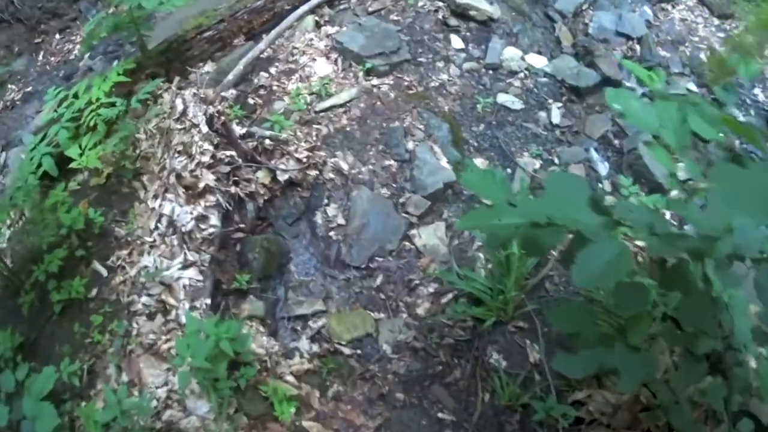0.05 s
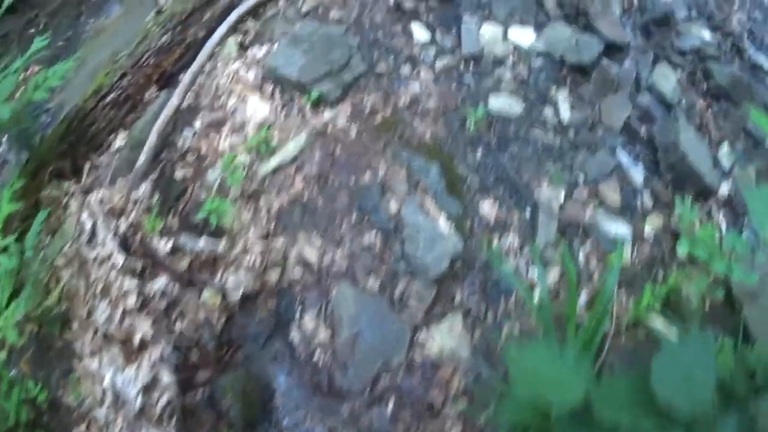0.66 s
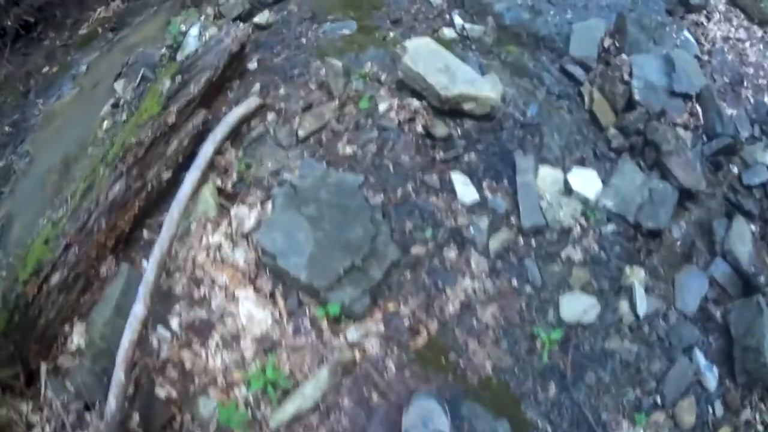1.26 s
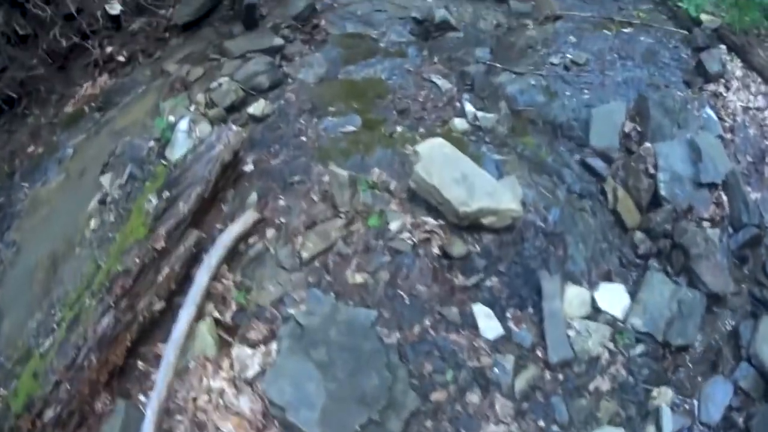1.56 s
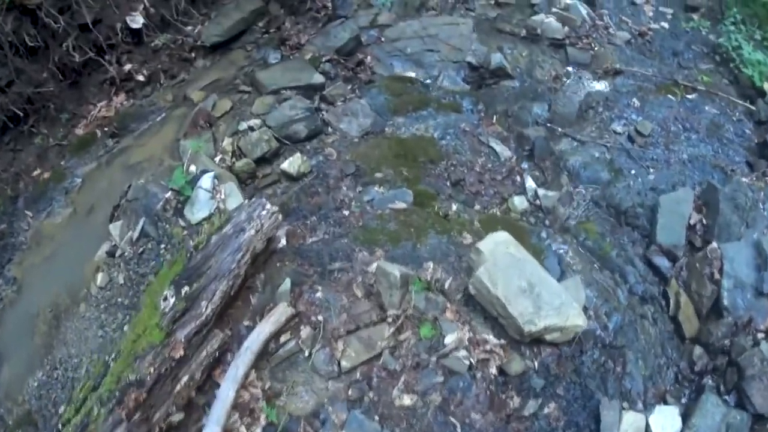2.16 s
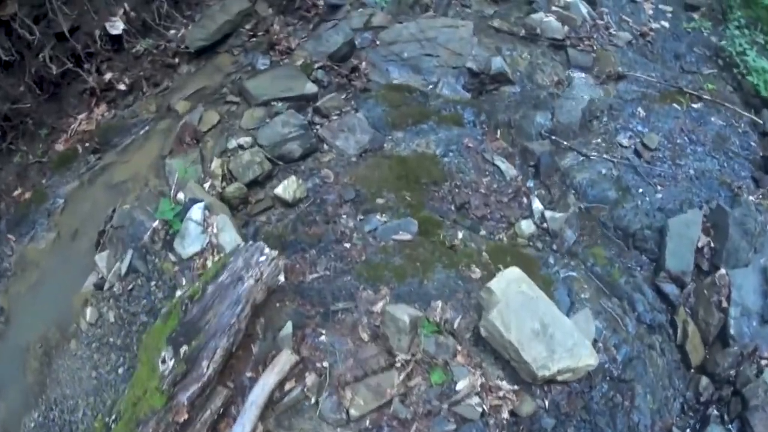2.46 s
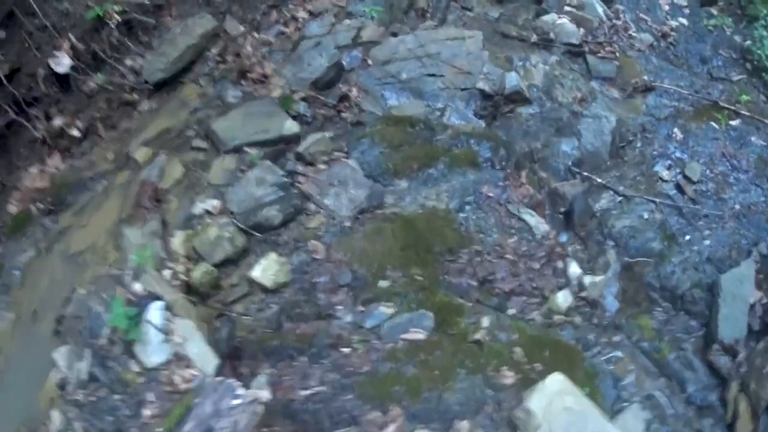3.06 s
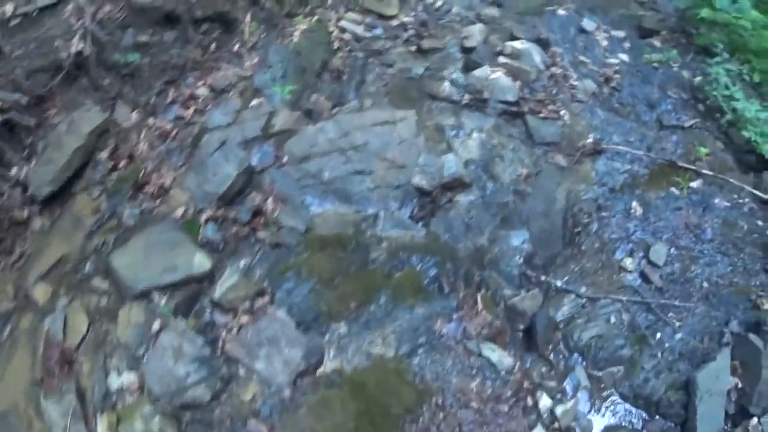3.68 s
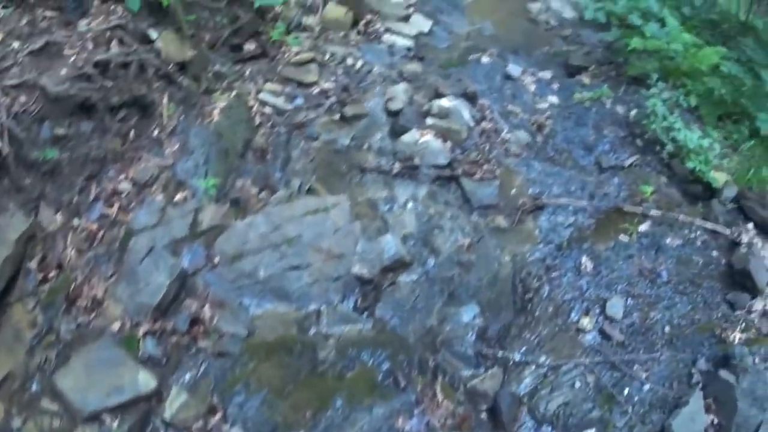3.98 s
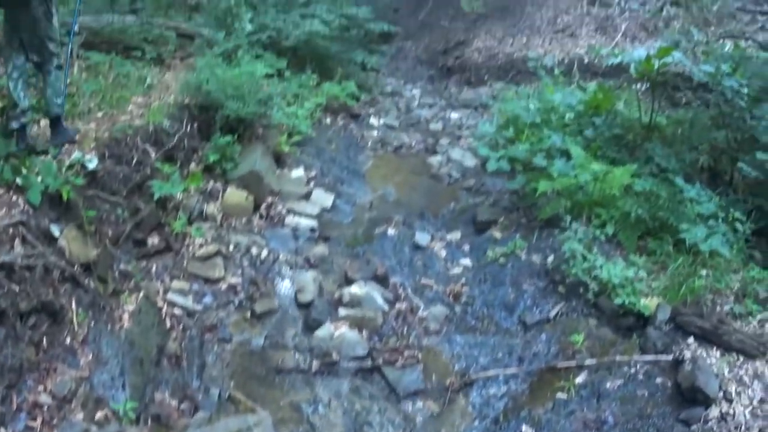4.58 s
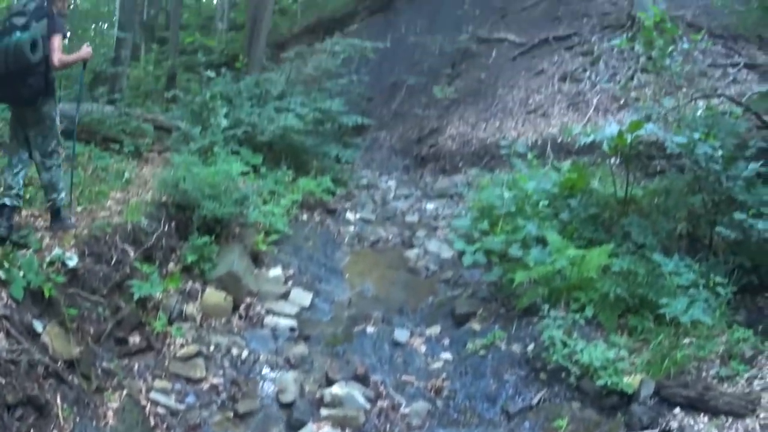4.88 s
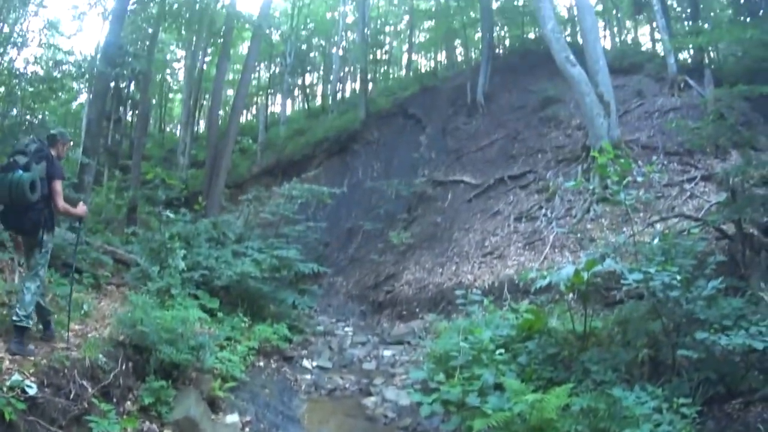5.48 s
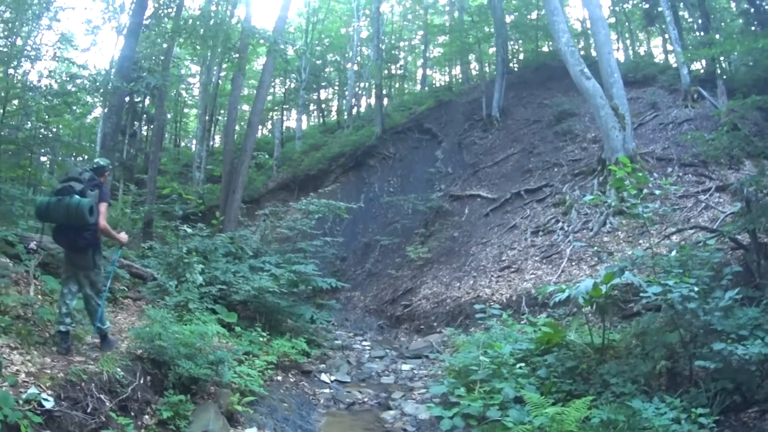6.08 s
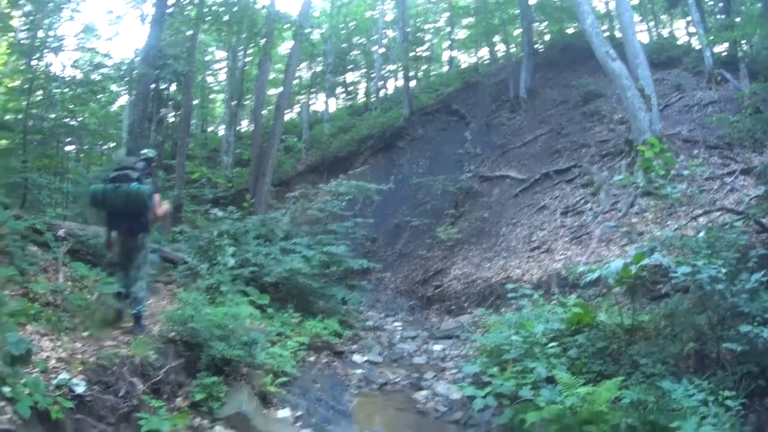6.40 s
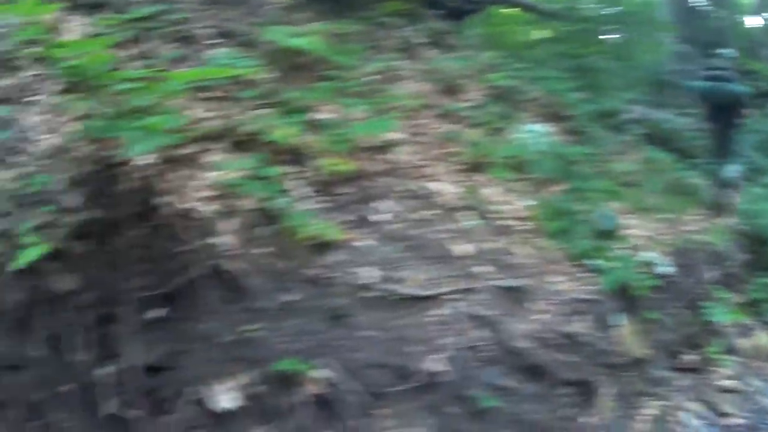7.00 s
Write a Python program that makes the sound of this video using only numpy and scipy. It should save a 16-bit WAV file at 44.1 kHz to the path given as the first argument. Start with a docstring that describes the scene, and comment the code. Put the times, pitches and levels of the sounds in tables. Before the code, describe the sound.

Footsteps on a stony stream bed clack and crunch, then ease off, leaving quiet water, drips and rustling cloth.

```python
"""Hiker on loose slate in a forest stream bed.

Boots thud on soil and grind on grit; tipped slabs knock and ring, thin flakes skid and scrape.
Clothes and leaves rustle as dense runs of tiny contacts, the leaves near the end.
A thin stream murmurs and drips throughout; banks and trees return a faint echo."""
import sys
import numpy as np
from scipy import signal
from scipy.fft import rfft, irfft
from scipy.io import wavfile

SR = 44100
rng = np.random.default_rng(int(sys.argv[2]) if len(sys.argv) > 2 else 0)


def transcribe(u):
    """Save the signal u as a 16-bit wav file named by the first command-line argument.

    u: samples, shape (n,) or (channels, n), limited to [-1, 1]; the rate is SR.
    q: integer samples, one column per channel.
    """
    v = np.clip(np.atleast_2d(u).T, -1, 1)
    q = np.round(v * 32767).astype(np.int16)
    wavfile.write(sys.argv[1], SR, q)


N = 319725
TIME = np.arange(N) / SR
HIT_N = SR // 6  # samples per short event
HIT_TIME = TIME[:HIT_N]


def undb(db):
    """Decibels to gain."""
    return 10 ** (np.asarray(db) / 20)


def unit_rms(x):
    """Scale to rms 1."""
    return x / np.sqrt(np.mean(x ** 2) + 1e-20)


def peak(x, db):
    """Scale to a peak level."""
    return x * undb(db) / np.abs(x).max()


def add(track, time_s, x):
    """Mix a sound into a stereo track."""
    start = max(int(time_s * SR), 0)
    track[:, start:start + x.shape[-1]] += x[..., :N - start]


def pan(x, pan_db):
    """Place left (+) or right (-)."""
    return x * undb(np.array([[pan_db], [-pan_db]]) / 2)


def widen(make, side_db, pan_db):
    """Two draws of a source: one panned, one in antiphase."""
    return pan(make(), pan_db) + undb(side_db) * make() * np.array([[1], [-1]])


def cut(x, hz, kind, order=2):
    """Butterworth low-pass or high-pass."""
    return signal.sosfilt(signal.butter(order, min(hz, SR / 2 - 1), kind, fs=SR, output="sos"), x)


def band(x, hz, width_hz):
    """One resonance, gain 1 at its centre."""
    hz = min(hz, SR * .4)
    return signal.lfilter(*signal.iirpeak(hz, hz / min(width_hz, SR / 4), SR), x)


def colour(x, spectrum):
    """Minimum-phase filter through (frequency [Hz], level [dB]) points; output rms 1."""
    hz, db = np.transpose(spectrum)
    grid_hz = np.linspace(1, SR / 2, 1025)
    gain = undb(np.interp(np.log(grid_hz), np.log(hz), db))
    cepstrum = irfft(np.log(gain))
    causal_fold = 1 + np.sign(np.fft.fftfreq(len(cepstrum)))
    response = irfft(np.exp(rfft(cepstrum * causal_fold)))
    return unit_rms(signal.fftconvolve(x, response)[:len(x)])


def blow(t60_s, rise_s):
    """Impact envelope: contact builds, ring dies."""
    return (1 - np.exp(-(HIT_TIME / rise_s) ** 2)) * np.exp(-np.log(1000) * HIT_TIME / t60_s)


def press(time_s, hold_s, attack_s, release_s):
    """Slow contact envelope: build, hold, release."""
    age_s = TIME - time_s
    return np.clip(age_s / attack_s, 0, 1) * np.exp(-np.maximum(age_s - hold_s, 0) / release_s)


def ring(hz, t60_s, rise_s):
    """One damped mode."""
    return np.sin(2 * np.pi * hz * HIT_TIME) * blow(t60_s, rise_s)


def drift(rate_hz):
    """Smooth random drift, rms 1."""
    knots = rng.standard_normal(N // 100)
    return unit_rms(np.interp(TIME * rate_hz, np.arange(len(knots)), knots))


def grains(n, per_s, spread_db):
    """Tiny contacts at random times, most weak, a few strong."""
    when, strength, sign = rng.random((int(n * per_s / SR) + 1, 3)).T
    gain = undb(-spread_db * np.log(strength + .02)) * np.sign(sign - .5)
    return np.bincount((when * n).astype(int), gain, n)


def grit(n, per_s, spread_db, top_hz, t60_s, ring_n=256):
    """Tiny contacts, each ringing briefly at its own pitch."""
    t = TIME[:ring_n]
    hz = np.linspace(0, top_hz, ring_n)[:, None]
    rings = np.sin(2 * np.pi * hz * t) * np.exp(-np.log(1000) * t / t60_s)
    when, strength, pitch, sign = rng.random((int(n * per_s / SR) + 1, 4)).T
    gain = undb(-spread_db * np.log(strength + .02)) * np.sign(sign - .5)
    particles = gain[:, None] * rings[(pitch * ring_n).astype(int)]
    samples = (when * n).astype(int)[:, None] + np.arange(ring_n)
    return np.bincount(samples.ravel(), particles.ravel(), n)[:n]


# Running water (frequency [Hz], level [dB])
STREAM_SPECTRUM = [(25, -10), (60, -4), (130, 0), (380, 0), (600, -3), (1100, -4), (2000, -8), (4500, -13),
                   (7000, -14), (11000, -18)]

def stream():
    """Shallow water: murmur from all around, fine hiss from ahead."""
    ahead, around = (colour(rng.standard_normal(N), STREAM_SPECTRUM) * undb(.8 * drift(21))
                     for _ in range(2))
    side = undb(-6.5) * around + undb(4.0) * band(around, 550, width_hz=1000)
    return undb(-63) * (ahead + side * np.array([[1], [-1]]))


def forest_echo(near, t60_s, echo_db):
    """Banks and trunks scatter a thin tail, independent left and right."""
    t = TIME[:SR]
    decay = np.exp(-np.log(1000) * t / t60_s) * (1 - np.exp(-t / 0.0116))
    spectrum = [(100, -4.5), (1200, -11), (4000, -0.5), (11000, -11.5)]
    echoes = []
    for channel in near:
        tail = colour(grains(SR, per_s=3600, spread_db=3.8), spectrum) * decay
        echoes.append(signal.fftconvolve(channel, tail / np.linalg.norm(tail))[:N])
    return undb(echo_db) * np.array(echoes)


def bubble(hz, cycles, glide):
    """A trapped bubble rings, rising in pitch as it nears the surface."""
    t60_s = cycles / hz
    stretch = 1 + glide * np.minimum(HIT_TIME / t60_s, 1)
    return np.sin(2 * np.pi * hz * HIT_TIME * stretch) * blow(t60_s, rise_s=0.00037)


def snap(hz, db):
    """One tiny contact with a very short ring."""
    burst = rng.standard_normal(HIT_N) * blow(t60_s=0.0091, rise_s=0.00021)
    return peak(band(burst, hz, width_hz=0.19 * hz), db)


# Drops and pebbles in puddles (time [s], level [dB], bubble pitch [Hz], t60 [cycles])
PUDDLE_DROPS = [(.1742, -41.5, 1530, 16), (2.7833, -47, 1510, 52), (3.61, -23, 1390, 18),
                (3.62, -33, 1390, 19), (4.449, -50, 3300, 56), (4.8156, -44.5, 1120, 30),
                (5.171, -41.5, 2800, 87), (5.329, -51.5, 1930, 33), (5.36, -50, 1350, 37),
                (5.608, -51, 1440, 66), (5.6953, -41, 1370, 33), (5.828, -49, 1720, 32),
                (5.9244, -39.5, 1970, 44), (5.9522, -48.5, 1340, 30), (6.279, -54, 1360, 37)]

def drips(count=280):
    """A few clear drops among small bubbles and splashes that grow as the pools come near."""
    out = np.zeros((2, N))
    for time_s, db, hz, cycles in PUDDLE_DROPS:
        add(out, time_s, pan(peak(bubble(hz, cycles, glide=0.037), db), -3.0))
    for when, pitch, strength, side in rng.random((count, 4)):
        db = -64 + 10 * strength ** 2 + 4 * when
        plink = peak(bubble(1100 * 6 ** pitch, cycles=40, glide=0.09), db)
        add(out, when * N / SR, pan(plink, 8 * (side - .5)))
    for when, pitch, strength, side in rng.random((count, 4)):
        db = -61 + 10 * strength ** 3 + 3 * when
        splash = snap(3000 * 2.7 ** pitch, db)
        add(out, when * N / SR, pan(splash, 8 * (side - .5)))
    return out


# Cloth and foliage (frequency [Hz], level [dB])
RUSTLE_SPECTRUM = [(60, -12.5), (160, -1), (380, -4), (560, -4.5), (1000, -0.5), (1800, -1.5), (3000, -1),
                   (6500, -3), (11000, -7)]
# Sleeve and trouser strokes (time [s], length [s], level [dB], low-pass [Hz])
CLOTH_STROKES = [(.01, 0.16, -65, 3970), (0.425, 0.33, -66.5, 3460), (1.559, 0.23, -57, 9100),
                 (3.066, 0.11, -63, 10000), (3.482, 0.13, -67, 9000), (3.699, 0.52, -57.5, 9100),
                 (3.8, 0.04, -50.5, 9050), (3.863, 0.082, -52.5, 10000), (4.184, .12, -63.5, 8000),
                 (4.306, 0.12, -59.5, 7040), (4.491, 0.165, -53, 10600), (4.642, 0.068, -57.5, 4970),
                 (4.829, 0.45, -61, 4960), (5.387, 0.048, -60.5, 5000), (6.025, 0.1, -60, 3480),
                 (6.353, 0.045, -65.5, 9100), (6.684, 0.082, -59, 5030), (6.831, 0.039, -65, 6100)]

def clothes():
    """Fibres catch and slip in quick, uneven swells."""
    out = np.zeros((2, N))
    catch = undb(2.66 * drift(110))
    for time_s, length_s, db, lowpass_hz in CLOTH_STROKES:
        n = int(length_s * SR)
        swell = np.sin(np.pi * (np.arange(n) / n) ** 0.46) ** 0.58
        speed = swell * catch[int(time_s * SR):][:n]

        def stroke():
            fibres = grit(n, per_s=6000, spread_db=1.2, top_hz=11240, t60_s=0.0046)
            return unit_rms(cut(colour(fibres, RUSTLE_SPECTRUM), lowpass_hz, "low", order=1))

        add(out, time_s, undb(db) * speed * widen(stroke, side_db=-10.5, pan_db=1.0))
    return out


# Passing fronds (time [s], hold [s], level [dB])
FROND_SWEEPS = [(6.994, 0.21, -51), (7.145, 0.089, -44)]

def leaves():
    """Foliage drags past on the right in dense, uneven crackles."""
    drag = sum(undb(db) * press(time_s, hold_s, attack_s=.075, release_s=.035)
               for time_s, hold_s, db in FROND_SWEEPS)
    crackle = widen(lambda: colour(grains(N, per_s=7000, spread_db=2.7), RUSTLE_SPECTRUM),
                    side_db=-10, pan_db=-5.5)
    return crackle * drag * undb(0.95 * drift(90))


# Soil creak, gravel grind, grit hiss (frequency [Hz], level [dB])
SOIL_SPECTRUM = [(24, -43), (40, -23.5), (155, -1.5), (214, -2), (265, -0.5), (413, 3), (525, -7.5),
                 (700, -6), (910, -57), (1540, -120)]
GRIND_SPECTRUM = [(200, -11.5), (450, -5), (750, -1.5), (1150, -3.5), (1600, -6.5), (2100, -17),
                  (3500, -24.5), (8000, -35.5)]
HISS_SPECTRUM = [(700, -16.5), (1500, 1.5), (3200, -3), (4800, -2.5), (7200, -5), (9000, -12),
                 (11500, -17.5)]
# Boot taking weight or pivoting (time [s], hold [s], soil level [dB], grind level [dB])
WEIGHT_SHIFTS = [(0.0, 0.045, -60.5, -60), (.29, 0.042, -67, -59), (.41, 0.17, -61, -59),
                 (.63, 0.089, -69, -57.5), (.83, .09, -59, -54.5), (.96, .14, -55, -60.5),
                 (1.2, 0.17, -65, -62.5), (1.36, 0.21, -59, -58.5), (1.759, 0.26, -63.5, -61),
                 (2.08, 0.22, -66, -64.5), (2.35, 0.23, -59.5, -62), (2.68, .08, -65.5, -65),
                 (3.04, 0.28, -63, -60), (3.43, 0.13, -60.5, -54), (3.69, .27, -66, -60),
                 (4.02, 0.14, -68.5, -65), (4.29, 0.075, -74, -64), (4.5, 0.22, -79, -70),
                 (4.87, 0.19, -67, -68), (5.78, .42, -70, -79.5), (6.63, 0.065, -68, -69),
                 (7.0, .25, -75, -61)]

def tread():
    """Shifting weight makes soil creak low and gravel grind, with a little hiss."""
    soil_gain, grind_gain = undb(-77.5), undb(-74)  # the standing foot never fully rests
    for time_s, hold_s, soil_db, grind_db in WEIGHT_SHIFTS:
        load = press(time_s, hold_s, attack_s=0.026, release_s=0.13)  # sole rolls on, ground settles
        soil_gain = np.hypot(soil_gain, undb(soil_db) * load)
        grind_gain = np.hypot(grind_gain, undb(grind_db) * load)
    soil = widen(lambda: colour(grains(N, per_s=900, spread_db=2.76), SOIL_SPECTRUM),
                 side_db=-14.0, pan_db=-6.0)
    gravel = widen(lambda: colour(grit(N, 900, 3.1, top_hz=2660, t60_s=0.0098), GRIND_SPECTRUM),
                   side_db=-9.5, pan_db=-2.5)
    hiss = widen(lambda: colour(grit(N, 2200, 1.7, top_hz=10980, t60_s=0.0097), HISS_SPECTRUM),
                 side_db=-9.0, pan_db=-0.3)
    creak = soil * soil_gain * undb(1.9 * drift(35))
    grind = (gravel + undb(-5.5) * hiss) * grind_gain * undb(1.5 * drift(50))
    return creak + grind


# Grit and twig snaps (time [s], level [dB], ring [Hz])
GRIT_SNAPS = [(.05, -41, 1800), (0.0886, -43.5, 2560), (0.554, -44, 1290), (.859, -41, 1190),
              (.8955, -38.5, 1650), (1.051, -43, 1400), (2.488, -43, 4600), (2.729, -43, 7700),
              (2.9047, -35.5, 4800), (3.086, -45, 6750), (3.114, -43, 6160), (3.1723, -40, 6500),
              (3.2628, -37, 7650), (3.3552, -43.5, 3200), (3.3546, -44, 5640), (3.433, -46, 6100),
              (3.461, -44, 5400), (3.7066, -43, 5650), (4.0125, -43, 4970), (4.402, -45, 4120),
              (4.427, -41.5, 5840), (5.2677, -44, 5860), (5.71, -43.5, 3620), (5.9739, -42.5, 3180),
              (6.473, -49.5, 6870), (6.53, -46.5, 6120), (6.571, -49, 7500), (6.5975, -47.5, 4830),
              (6.92, -48.5, 4180), (7.1844, -30, 2620), (7.1856, -29, 5660)]

def grit_ticks():
    """Single grains and twig tips snap."""
    out = np.zeros((2, N))
    for time_s, db, hz in GRIT_SNAPS:
        add(out, time_s, snap(hz, db))
    return pan(out, -.5)


# Sole on wet grit (time [s], length [s], level [dB], relative hiss [dB])
SOLE_SCUFFS = [(0.02, 0.1, -56, -26), (0.723, 0.033, -52, -1.5), (0.913, 0.08, -46.5, -24),
               (0.955, 0.069, -46, -26), (1.087, 0.12, -56, -31), (1.412, 0.056, -48.5, -7),
               (1.518, 0.044, -48, 5), (1.627, 0.047, -62.5, 11), (1.94, 0.053, -43.5, -9),
               (2.905, 0.095, -43, -10), (2.944, 0.025, -40, -5), (2.964, 0.062, -42.5, -7.5),
               (2.983, 0.024, -42.5, -1.5), (3.008, .11, -50, -9.5), (3.23, 0.034, -46, 1),
               (3.89, 0.025, -53, -5)]

def boot_scuffs():
    """Grit crushed under the sole sounds dull; grit at its edge hisses."""
    out = np.zeros((2, N))
    for time_s, length_s, db, hiss_db in SOLE_SCUFFS:
        pressure = np.sin(np.pi * np.minimum(HIT_TIME / length_s, 1) ** 0.3)
        crush = colour(grains(HIT_N, per_s=1800, spread_db=5.1), GRIND_SPECTRUM)
        hiss = colour(grains(HIT_N, per_s=4000, spread_db=2.4), HISS_SPECTRUM)
        add(out, time_s, undb(db) * pressure * (pan(crush, -4.5) + undb(hiss_db) * pan(hiss, -1)))
    return out


# Heel and sole landings (time [s], level [dB], pitch [Hz], t60 [s])
FOOTFALLS = [(0.402, -46, 686, 0.018), (.419, -39, 550, 0.0094), (0.457, -43, 230, 0.015),
             (.511, -41, 282, 0.03), (0.5227, -41.5, 197, 0.016), (.908, -31.5, 310, 0.034),
             (0.9413, -35.5, 100, .04), (1.118, -41.5, 115, .045), (1.314, -38.5, 330, 0.021),
             (1.377, -46, 400, 0.029), (1.525, -37.5, 228, 0.059), (1.954, -40.5, 220, 0.05),
             (2.067, -37, 328, 0.031), (2.1338, -42.5, 169, 0.034), (2.2234, -42.5, 320, 0.022),
             (2.4457, -45.5, 206, 0.0082), (2.6987, -46, 327, 0.039), (2.895, -36, 223, 0.017),
             (2.9648, -28.5, 224, 0.0085), (3.143, -45.5, 135, 0.035), (3.235, -34, 306, 0.017),
             (3.452, -42, 250, 0.02), (3.4616, -29.5, 190, 0.033), (3.898, -54, 126, 0.072),
             (4.801, -57, 138, 0.045), (5.259, -51, 136, 0.042), (5.486, -50.5, 193, 0.044),
             (6.1811, -45, 290, 0.0063), (6.72, -54, 147.4, 0.032)]

def boot_thuds():
    """Rubber on packed soil: a few low cycles and a muffled crush."""
    out = np.zeros((2, N))
    for time_s, db, hz, t60_s in FOOTFALLS:
        modes = ring(hz, t60_s, rise_s=0.0008) + 0.3 * ring(2.1 * hz, 0.98 * t60_s, rise_s=0.0021)
        soil = cut(modes, 80, "high")
        crush = colour(rng.standard_normal(HIT_N), GRIND_SPECTRUM) * blow(t60_s=0.0061, rise_s=0.00017)
        add(out, time_s, peak(soil, db) + peak(crush, db - 4))
    return pan(out, -5.5)


# Modes of a thin flake (frequency [Hz], width [Hz], level [dB])
FLAKE_RESONANCES = [(1220, 90, 10), (2298, 87, 2), (2983, 360, -1), (3415, 200, -4), (4340, 130, 0),
                    (5000, 260, -5), (7450, 210, -1.5), (8400, 870, -9)]
# Flake skidding on flake (time [s], level [dB], favoured ring [Hz], t60 [s])
FLAKE_SKIDS = [(.3492, -27, 3340, 0.067), (1.5135, -26, 3430, 0.033), (1.517, -21.5, 3300, 0.011),
               (1.5238, -19, 3160, 0.036), (1.5245, -25.5, 1230, 0.06), (1.5792, -26.5, 4600, 0.029),
               (1.5845, -23, 2310, .018), (1.5908, -25, 3400, .026), (1.653, -37.5, 2310, 0.072),
               (3.2318, -34.5, 1240, 0.21), (3.2325, -30, 7300, 0.038)]

def flake_scrapes():
    """A contact and a dying run of slips ring a flake; the contact point decides which mode leads."""
    out = np.zeros((2, N))
    for time_s, db, favoured_hz, t60_s in FLAKE_SKIDS:
        slips = grains(HIT_N, per_s=9800, spread_db=3.5) * blow(t60_s, rise_s=0.0011)
        force = signal.unit_impulse(HIT_N) + undb(-3.5) * slips / np.linalg.norm(slips)
        flake = np.zeros(HIT_N)
        for hz, width_hz, mode_db in FLAKE_RESONANCES:
            octaves_off = abs(np.log2(hz / favoured_hz))
            flake += undb(mode_db - 22 * octaves_off ** .5) * band(force, hz, width_hz)
        add(out, time_s, peak(flake, db))
    return pan(out, -1.8)


# Modes of a slab (frequency [ratio], level [dB], t60 [ratio])
SLAB_RESONANCES = [(.7, -10.5, 0.55), (.9, 5.5, 1.2), (1.11, 11, 0.84), (1.32, 5.5, 0.84),
                   (1.48, -5.5, 0.68), (1.67, -13.5, 0.92), (2.85, -13, 0.59)]
# Contact crack (frequency [Hz], level [dB])
CRACK_SPECTRUM = [(120, -30), (500, 1), (1500, -4.5), (2100, -9), (3000, 3), (4500, -11.5), (6000, -13.5),
                  (7400, -10.5), (9000, -21.5), (11500, -27)]
# Stone on stone (time [s], level [dB], ring [Hz], t60 [s], relative thud [dB], relative crack [dB])
SLAB_HITS = [(0.0237, -41.5, 1630, 0.022, -4, -20), (0.301, -35.5, 1080, 0.0073, -18, -18),
             (0.3481, -28, 1053, 0.015, -24, 1.5), (0.4274, -46, 910, 0.0099, 0, -20),
             (0.819, -41, 1080, 0.025, -3, -6), (0.9406, -6, 1064, 0.014, -9, -10.5),
             (0.9434, -16.5, 1536, 0.0088, -12, -10), (0.9536, -10.5, 1110, 0.0084, -24, -15),
             (1.0902, -36, 610, 0.064, 2.5, -20), (1.117, -32.5, 785, 0.014, -0.5, -22),
             (1.2476, -44, 1480, 0.026, 1, 9), (1.405, -36.5, 765, 0.034, -11, -6),
             (1.413, -29, 1200, 0.022, -12.5, -17), (1.949, -30.5, 1125, 0.021, -8.5, -35),
             (2.894, -35.5, 830, 0.013, -19, -26), (2.914, -40, 1110, 0.021, -11, -12),
             (2.925, -29.5, 970, 0.014, -6, -20), (2.9437, -39, 1050, 0.024, -1, -16),
             (2.9604, -22.5, 700, 0.024, -3.5, -19), (2.976, -28.5, 1184, 0.018, -17, -14),
             (2.997, -32, 1150, .03, -18, -14), (3.206, -45.5, 1290, 0.012, -21, -8),
             (3.5177, -25, 1113, 0.012, -12, -14), (3.521, -36, 1380, 0.015, -1.5, -3),
             (3.611, -39, 1330, 0.0071, -8, -0.5), (3.621, -34.5, 1190, 0.029, -9, -16),
             (4.092, -38.5, 835, 0.035, -26, -16), (4.0969, -40.5, 1075, 0.013, -2, -8),
             (4.317, -44, 1256, 0.029, -5.5, -3.5), (4.3511, -38.5, 797, 0.018, -17, -12),
             (4.643, -44.5, 1070, 0.0092, -9, 2), (4.9633, -43, 2260, 0.013, -19, -1),
             (6.3701, -50, 1080, 0.016, -8, -9), (6.648, -47, 766, .03, -7, -17),
             (6.672, -49, 700, .02, 2, 2.5), (6.849, -47, 885, 0.012, -5.5, 0)]

def slab_knocks():
    """A slab rings briefly, shakes its bed and cracks at the point of contact."""
    out = np.zeros((2, N))
    bed = cut(ring(253, 0.018, .001) + 0.74 * ring(421, 0.022, 0.002), 190, "high")
    for time_s, db, hz, t60_s, thud_db, crack_db in SLAB_HITS:
        slab = sum(undb(mode_db) * ring(hz * hz_ratio, t60_s * t60_ratio, rise_s=0.0012)
                   for hz_ratio, mode_db, t60_ratio in SLAB_RESONANCES)
        crack = colour(rng.standard_normal(HIT_N), CRACK_SPECTRUM) * blow(t60_s=0.012, rise_s=0.00048)
        chatter = band(rng.standard_normal(HIT_N), hz, .5 * hz) * blow(t60_s=0.023, rise_s=0.0036)
        body = peak(cut(slab, 0.27 * hz, "high"), 0) + peak(chatter, -14.5)
        knock = pan(body, -2.2) + pan(peak(bed, thud_db), -6.0) + pan(peak(crack, crack_db), -1)
        add(out, time_s, undb(db) * knock)
    return out


def scene():
    """Feet and stones close by, stream and trees around."""
    near = slab_knocks() + boot_thuds() + flake_scrapes() + boot_scuffs() + grit_ticks() + drips()
    echo = forest_echo(near, t60_s=0.59, echo_db=-22.5)
    return near + echo + tread() + clothes() + leaves() + stream()


def record(dry):
    """Steep low-pass at 11 kHz."""
    return signal.sosfilt(signal.ellip(10, .2, 70, 11000, fs=SR, output="sos"), dry)


dry = scene()
out = record(dry)
transcribe(out)
```